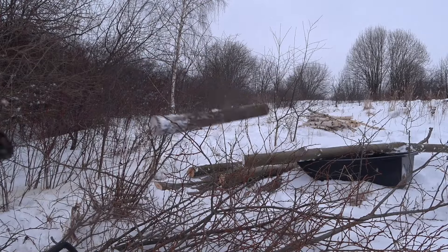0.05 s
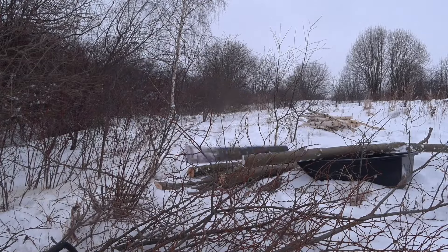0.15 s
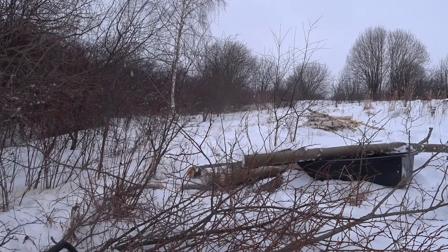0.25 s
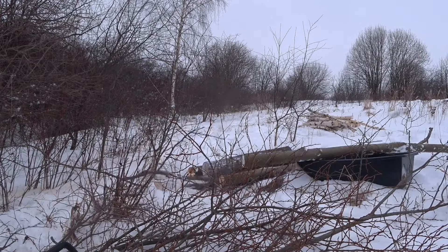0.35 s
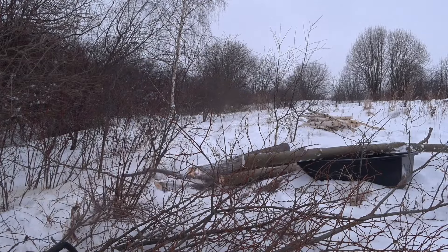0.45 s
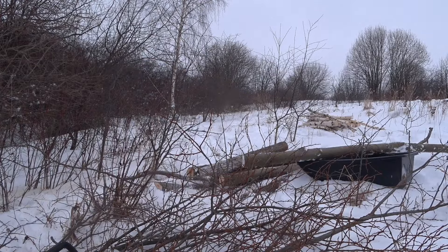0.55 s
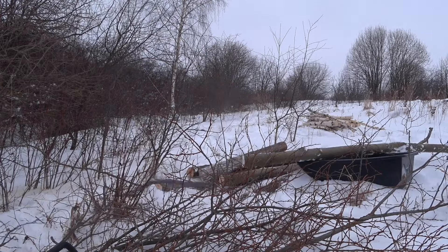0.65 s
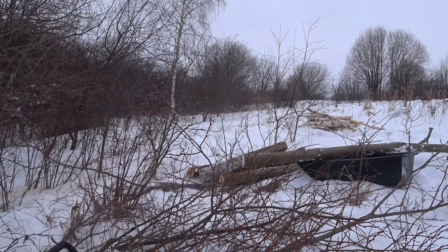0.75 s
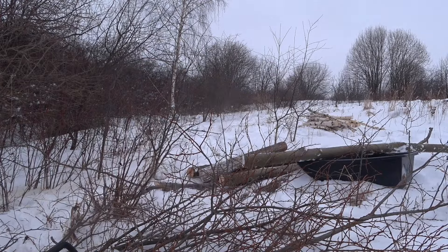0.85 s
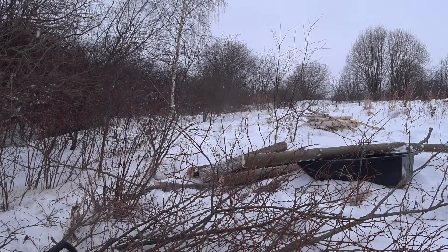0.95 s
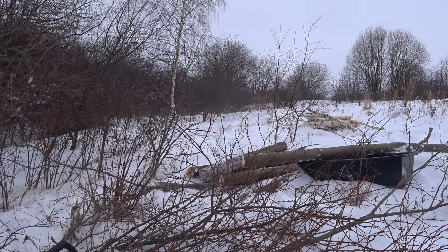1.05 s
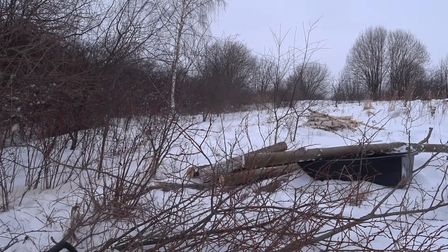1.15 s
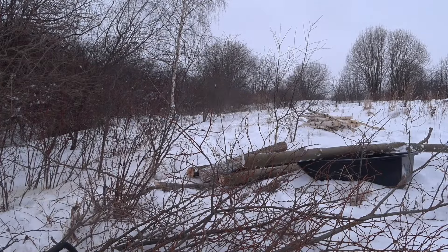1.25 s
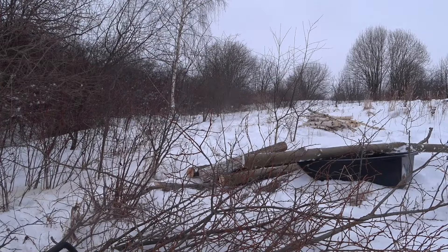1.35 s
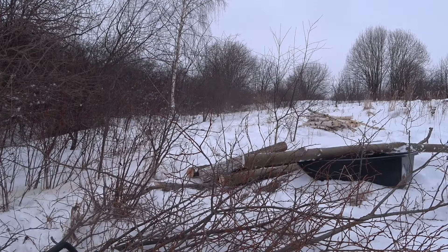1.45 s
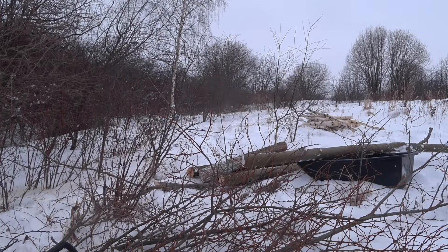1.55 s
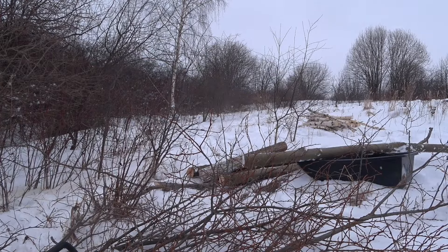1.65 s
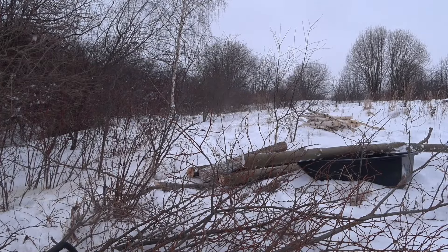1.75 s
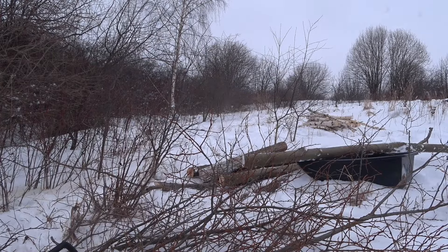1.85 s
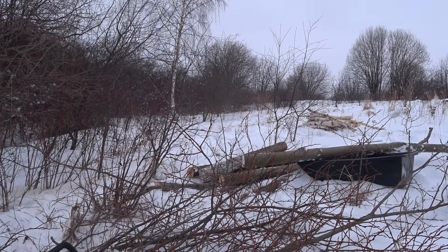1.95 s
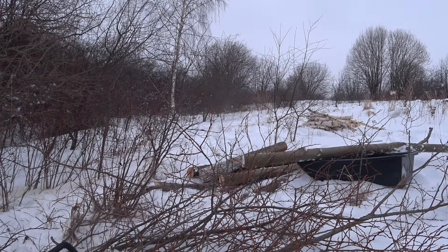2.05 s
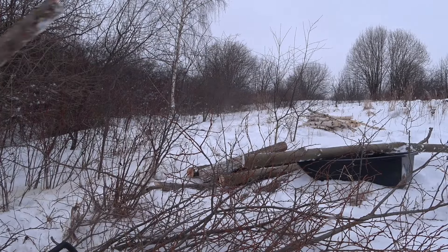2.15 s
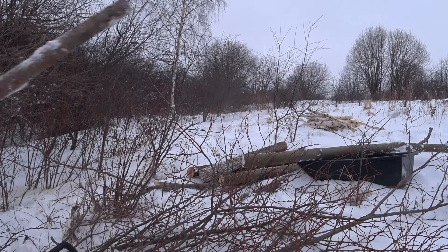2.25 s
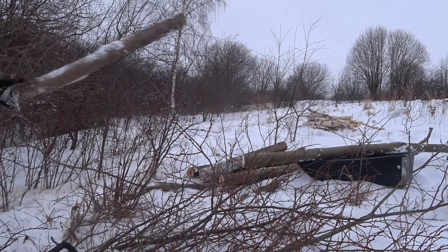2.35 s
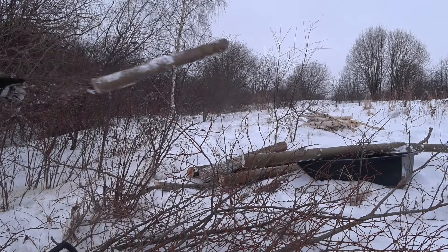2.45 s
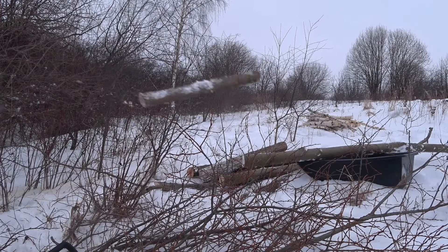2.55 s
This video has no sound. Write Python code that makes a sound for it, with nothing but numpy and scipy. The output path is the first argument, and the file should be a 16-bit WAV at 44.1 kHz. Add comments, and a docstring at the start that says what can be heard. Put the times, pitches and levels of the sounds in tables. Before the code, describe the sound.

A tossed log hits a woodpile with a hollow double knock and settles as bark crumbs trickle down. Then, close to the microphone, twigs snap, snow crunches lightly and a jacket swishes in a quiet open field.

```python
"""Snowy field: a tossed log lands on a woodpile with a hollow double knock and a small settling bump.
Each contact rings the wood's modes and rattles the stack; bark cracks, crumbs and snow trickle down,
and the trees return a faint tail. Close by, twigs snap and snow crunches underfoot, and a jacket
swishes as the next log is swung. A soft, far roar and low air buffeting lie under it all."""
import sys
import numpy as np
from scipy import signal
from scipy.fft import rfft, irfft
from scipy.io import wavfile

SR = 44100
rng = np.random.default_rng(int(sys.argv[2]) if len(sys.argv) > 2 else 0)


def unload_audio(sound):
    """Save the sound as a 16-bit wav file, at the path given as the first command line argument."""
    columns = np.transpose(np.atleast_2d(sound))
    # keep every value between -1 and 1, then stretch to whole-number steps
    steps = np.round(np.clip(columns, -1, 1) * 32767)
    wavfile.write(sys.argv[1], SR, steps.astype(np.int16))


N = 114660
T = np.arange(N) / SR
CUTOFF_HZ, FFT_SIZE = 11100, 8192
HZ = np.maximum(np.fft.rfftfreq(FFT_SIZE, 1 / SR), 1)


def from_db(db):
    """Decibels to gain."""
    return 10 ** (np.asarray(db) / 20)


def at_hz(spectrum):
    """Table of f/Hz, level/dB, interpolated over log frequency."""
    hz, db = np.transpose(spectrum)
    return np.interp(np.log(HZ), np.log(hz), db)


def colour(x, spectrum):
    """Minimum-phase filter of the given shape; white noise keeps its power."""
    gain = from_db(at_hz(spectrum)) / (1 + (HZ / CUTOFF_HZ / 1.1) ** 20)
    gain /= np.sqrt(np.mean(gain ** 2))
    half = FFT_SIZE // 2
    cepstrum = irfft(np.log(gain + 1e-9))
    cepstrum[1:half] *= 2
    cepstrum[half + 1:] = 0
    impulse = irfft(np.exp(rfft(cepstrum)))[None, :half]
    return signal.oaconvolve(np.atleast_2d(x), impulse, axes=1)[:, :N]


def pan(db):
    """Channel gains, left louder by db."""
    return from_db(np.array([[db], [-db]]) / 2)


def stereo(noise, side_db=-12.5):
    """Mid and side from two draws of a noise."""
    return noise() + from_db(side_db) * noise() * [[1], [-1]]


def white():
    """Gaussian noise, rms 1."""
    return rng.standard_normal(N)


def grains(grains_per_s=5000, spread_db=3, clumps_per_s=300, clump_depth_db=3):
    """Dense clicks of uneven size, in clumps, rms 1."""
    knots_s = np.arange(0, T[-1], 1 / clumps_per_s)
    clump_db = clump_depth_db * np.interp(T, knots_s, np.clip(white()[:len(knots_s)], -2, 2))
    size_db = spread_db * np.minimum(rng.exponential(1, N), 5)
    onsets = rng.random(N) < grains_per_s / SR
    clicks = onsets * rng.choice([-1, 1], N) * from_db(size_db + clump_db)
    return clicks / clicks.std()


def decay(start_s, t60_s):
    """Sudden start, exponential fall."""
    out = np.zeros(N)
    live = slice(*np.searchsorted(T, [start_s, start_s + 2 * t60_s]))
    out[live] = from_db(-60 * (T[live] - start_s) / t60_s)
    return out


def swell(peak_s, sigma_s):
    """Gaussian rise and fall."""
    z = (T - peak_s) / sigma_s
    return np.exp(-.5 * z ** 2) * (abs(z) < 4)


def contour(levels):
    """Gain over time from a table of t/s, level/dB."""
    return from_db(np.interp(T, *np.transpose(levels)))


def power_sum(envelopes):
    """Joint envelope of independent noises."""
    return np.sqrt(sum(envelope ** 2 for envelope in envelopes))


def far_roar():
    """Soft distant roar, wider in the treble."""
    # mid spectrum: f/Hz, level/dB
    spectrum = [(25, -41), (70, -32.5), (140, -26.5), (220, -14.5), (300, -7), (430, -5), (650, 1.5),
                (800, 0), (1050, -5.5), (1420, -11.5), (2800, -20), (6400, -25), (11000, -24.5)]
    # tilt of side against mid: f/Hz, level/dB
    side_tilt = [(30, -6), (140, -13), (300, -14), (650, -11), (1100, -3.5), (1600, 1), (2600, 3),
                 (4500, -1), (7000, -2.5), (11000, -1)]
    # slow drift: t/s, level/dB
    levels = [(0, -56), (.6, -55), (1.1, -56.5), (1.65, -56), (1.85, -56), (2.15, -53.5), (2.6, -55.5)]
    side_spectrum = np.transpose([HZ, at_hz(spectrum) + at_hz(side_tilt)])
    mid = colour(white(), spectrum)
    side = from_db(-6) * colour(white(), side_spectrum)
    return contour(levels) * (mid + side * [[1], [-1]]) * pan(db=.2)


def buffeting():
    """Low bumps of air and handling at the microphone."""
    # rumble: f/Hz, level/dB
    spectrum = [(25, -22), (70, -5), (150, -1), (250, -1.5), (500, -24), (1000, -44)]
    # bumps: t/s, level/dB
    levels = [(0, -88), (.07, -87), (.11, -66), (.18, -87), (.25, -64), (.31, -78), (.36, -63), (.41, -78),
              (.51, -66), (.58, -88.5), (2.15, -84.5), (2.4, -69.5), (2.49, -59), (2.6, -53.5)]
    return contour(levels) * colour(stereo(white, side_db=-3), spectrum)


def field_echo(x, delay_s=.004):
    """Quick scatter from brushwood, faint long tail from the trees."""
    # echo colour: f/Hz, level/dB
    spectrum = [(100, -7), (300, -6), (1000, -9.5), (3000, -2.5), (11000, -4.5)]
    tail = 0
    for db, t60_s in ((-21, .13), (-32, .8)):  # brushwood, trees
        envelope = decay(delay_s, t60_s)
        tail += from_db(db) * envelope / np.linalg.norm(envelope) * stereo(white, side_db=-5)
    return signal.fftconvolve(x, colour(tail, spectrum)[:, :SR], axes=1)[:, :N]


def jacket():
    """Cloth on cloth: a dull rub and a grainy hiss per swish."""
    # swishes: t/s, sigma/s, rub level/dB, hiss level/dB
    swishes = [(.085, 0.054, -78, -56.5), (0.653, 0.018, -59.5, -58.5), (0.713, 0.014, -48.5, -51),
               (0.762, 0.048, -59, -65), (1.323, 0.023, -59.5, -66), (1.541, .06, -61, -73),
               (1.981, 0.025, -53.5, -53), (2.101, 0.046, -56, -64), (2.269, 0.042, -55.5, -71),
               (2.427, 0.075, -58, -71), (2.488, .028, -54, -58)]
    # rub: f/Hz, level/dB
    rub_spectrum = [(60, -37), (200, -12), (400, -4), (1000, 1.5), (2200, -0.5), (4000, -6), (7000, -15.5),
                    (11000, -28)]
    # hiss: f/Hz, level/dB
    hiss_spectrum = [(100, -20), (1000, -6.5), (3000, -3), (6000, 3), (11000, 1)]
    rub = power_sum(from_db(db) * swell(t_s, sigma_s) for t_s, sigma_s, db, _ in swishes)
    hiss = power_sum(from_db(db) * swell(t_s, sigma_s) for t_s, sigma_s, _, db in swishes)
    fabric = stereo(white) + stereo(grains) / 2
    return colour(stereo(white) * rub, rub_spectrum) + colour(fabric * hiss, hiss_spectrum)


def snow_crunch():
    """Snow gives way underfoot in short, grainy bursts."""
    # crunches: t/s, level/dB, sigma/s
    crunches = [(.876, -43.5, 0.0038), (1.043, -52, .0015), (1.1808, -43, 0.001), (1.1872, -40, 0.0014),
                (1.193, -44, .0015), (1.207, -54, 0.003)]
    # snow: f/Hz, level/dB
    spectrum = [(25, -25), (70, -13), (160, -5.5), (400, 2), (1000, 2.5), (2500, -1.5), (5000, -8.5),
                (11000, -20.5)]
    envelope = sum(from_db(db) * swell(t_s, sigma_s) for t_s, db, sigma_s in crunches)
    return colour(stereo(grains) * envelope, spectrum)


def twig_snaps():
    """Dry twigs break underfoot, each a sharp noise burst."""
    # snaps: t/s, level/dB, t60/s, pan/dB
    snaps = [(.128, -40.5, 0.0077, -4), (0.147, -42.5, .006, 0), (.3815, -37.5, 0.011, -2.5),
             (0.425, -42, 0.0067, 1), (0.6884, -46, .006, -2), (0.8073, -28, .006, 8),
             (0.8083, -31, .005, 5), (.8485, -48, .008, 2), (1.0335, -45.5, 0.0047, 3),
             (1.1809, -32.5, 0.01, 7.5), (1.1854, -35.5, 0.011, 4), (1.1973, -45, 0.059, 6),
             (1.2056, -31, 0.0028, 1), (1.2072, -32, 0.0036, 8), (1.2233, -36, 0.007, 6),
             (1.2352, -43, 0.0047, 10), (2.5699, -47.5, 0.011, 7)]
    # twig: f/Hz, level/dB
    spectrum = [(60, -25), (500, -15), (1150, 2.5), (1800, -4), (2700, 4), (4200, -3), (5900, 4),
                (8500, 0.5), (11000, 1)]
    envelope = sum(from_db(db) * decay(t_s, t60_s) * pan(pan_db) for t_s, db, t60_s, pan_db in snaps)
    return colour(stereo(white) * envelope, spectrum)


def crumb_fall(landing_s=.228):
    """Bark crumbs and snow burst loose, then trickle through the pile."""
    # crumbs: f/Hz, level/dB
    spectrum = [(40, -26), (200, -6), (600, -2), (1500, 2), (3000, -0.5), (5000, -1), (8000, 1), (11000, 1)]
    burst = from_db(-38) * decay(landing_s, t60_s=.21)
    trickle = from_db(-46) * decay(landing_s, t60_s=1.24)
    return colour(stereo(grains) * (burst + trickle), spectrum)


def bark_cracks():
    """Bark splinters under the blows in bright noise bursts."""
    # cracks: t/s, level/dB, t60/s
    cracks = [(0.2004, -24.5, 0.014), (.2031, -28, 0.045), (.2145, -36, 0.056), (0.2179, -26.5, .022),
              (0.2249, -24, 0.01), (0.2291, -20, 0.016), (0.2318, -16.5, 0.0046), (0.2524, -36, .008),
              (0.2557, -36, 0.007)]
    # bark: f/Hz, level/dB
    spectrum = [(60, -40), (400, -8), (1500, -0.5), (2800, -2), (4500, -2.5), (6900, 1.5), (8500, -6),
                (10000, -1), (12000, -5.5)]
    envelope = power_sum(from_db(db) * decay(t_s, t60_s) for t_s, db, t60_s in cracks)
    return colour(stereo(white) * envelope, spectrum)


def log_knocks(spread_db=.5, rattle_db=-19.5, rattle_t60_s=.1):
    """Each blow rings the modes by strike position and contact hardness, and rattles the stack."""
    # log on pile: t/s, level/dB, contact peak f/Hz, position along the log (0-1)
    blows = [(0.2032, -13, 746, 0.07), (0.2059, -17.5, 530, 0.1), (0.2094, -20, 420, 0.25),
             (0.2211, -29, 2030, 0), (0.2259, -32.5, 2000, 0.44), (0.2279, -16.5, 1860, 0.34),
             (0.2305, -26.5, 1200, 0.32), (0.2589, -38, 1450, 0.52), (0.3219, -40, 594, 0.07),
             (0.3403, -46, 506, 0.07)]
    # wood modes: f/Hz, level/dB, t60/s
    modes = [(233, -14.5, 0.046), (302, -21, 0.21), (521, 1, 0.051), (577, -7.5, 0.11), (654, -8.5, 0.14),
             (726, 0.5, 0.13), (852, -6, 0.078), (927, 13.6, 0.0094), (1085, 3.5, 0.045), (1244, -3, 0.045),
             (1443, -8.5, 0.044), (1530, -0.1, 0.031), (2023, -6.5, 0.04), (2650, -9, 0.025)]
    # dull stack rattle: f/Hz, level/dB
    rattle_spectrum = [(30, -26), (100, -16.5), (160, -10), (250, 1), (350, -6), (450, 1), (1100, -10),
                       (1800, -9), (3000, -28), (11000, -24)]
    mode_hz, mode_db, t60_s = np.transpose(modes)
    t = T[:SR // 2]
    rings = np.cos(2 * np.pi * mode_hz[:, None] * t) * from_db(-60 * t / t60_s[:, None])
    knocks = np.zeros(N)
    for t_s, db, contact_hz, position in blows:
        mode_shape = np.cos(np.pi * position * np.arange(len(modes)))
        weights = mode_shape * from_db(db + mode_db + spread_db * rng.standard_normal(len(modes)))
        pole = np.exp(-2 * np.pi * contact_hz / SR)
        bandpass = [(1 - pole ** 2) / 2, 0, (pole ** 2 - 1) / 2, 1, -2 * pole, pole ** 2]
        knock = signal.sosfilt([bandpass, bandpass], weights @ rings)
        knocks += np.interp(T - t_s, t, knock, left=0, right=0)
    rattle = power_sum(from_db(db + rattle_db) * decay(t_s, rattle_t60_s) for t_s, db, _, _ in blows)
    return knocks + colour(stereo(white, side_db=-16) * rattle, rattle_spectrum)


def scene(left_lag_s=4e-5):
    """Pile slightly right, thrower close on the left."""
    left, right = log_knocks()
    knocks = np.array([np.interp(T - left_lag_s, T, left), right])
    pile = (knocks + bark_cracks() + crumb_fall()) * pan(db=-1.6)
    direct = pile + twig_snaps() + snow_crunch() * pan(db=3)
    return direct + field_echo(direct) + jacket() * pan(db=3.5) + far_roar() + buffeting()


def record(dry):
    """Steep zero-phase low-pass."""
    return signal.sosfiltfilt(signal.butter(36, CUTOFF_HZ, fs=SR, output="sos"), dry)


dry = scene()
out = record(dry)
unload_audio(out)
```